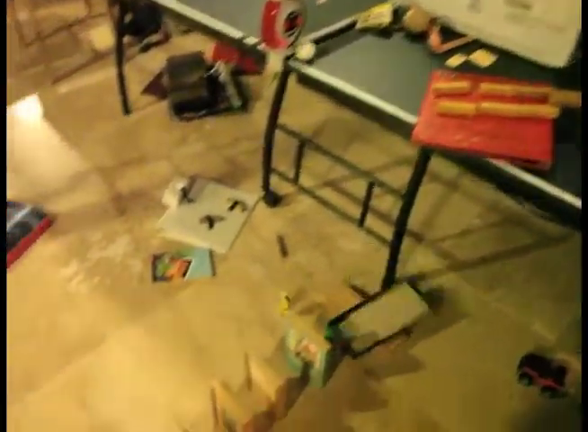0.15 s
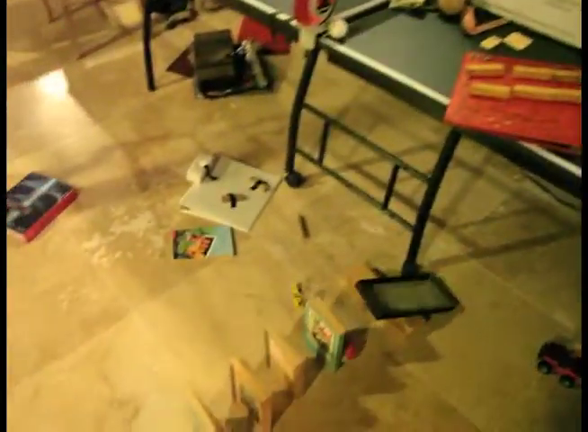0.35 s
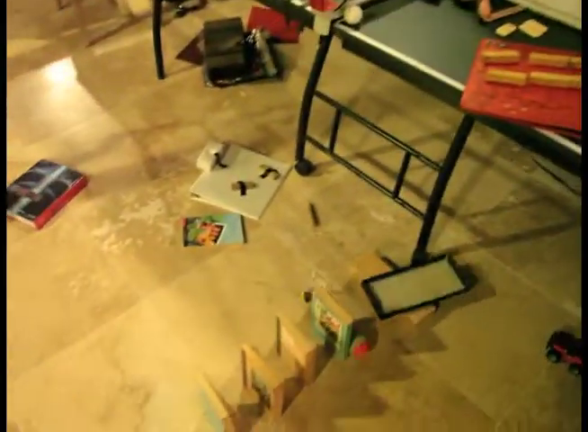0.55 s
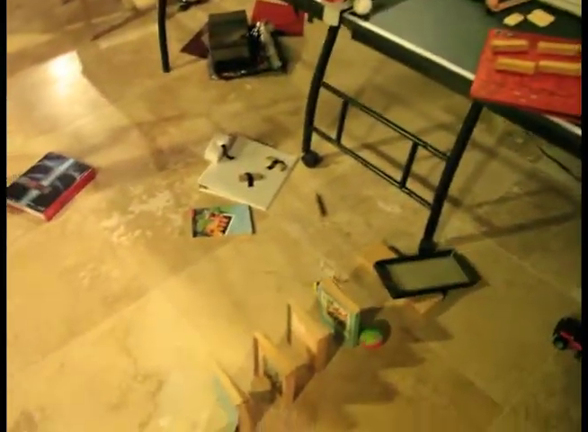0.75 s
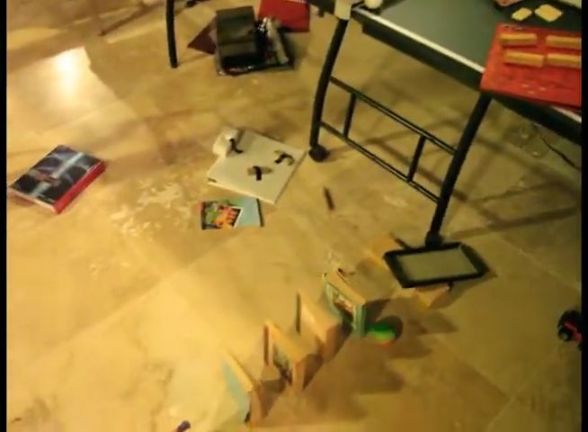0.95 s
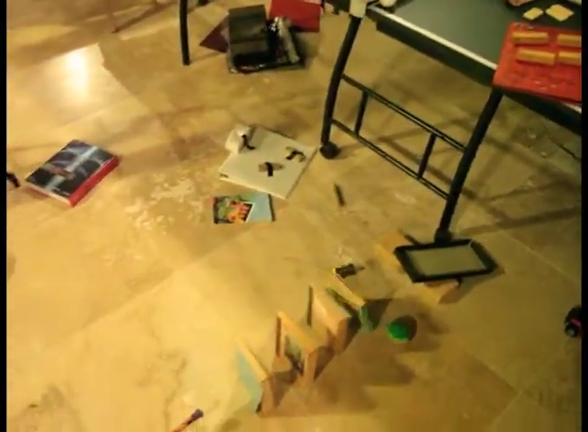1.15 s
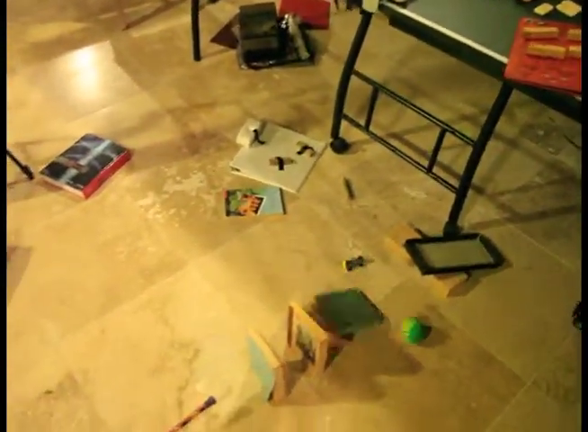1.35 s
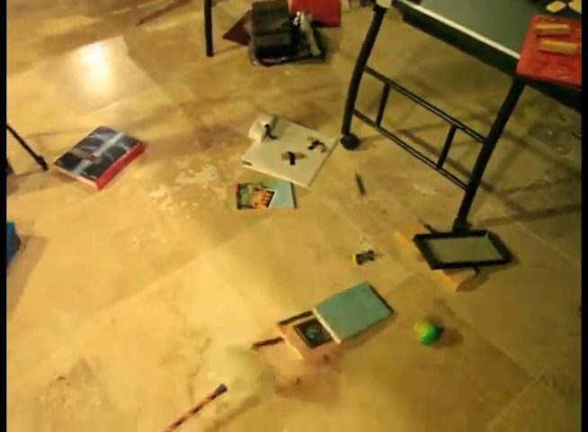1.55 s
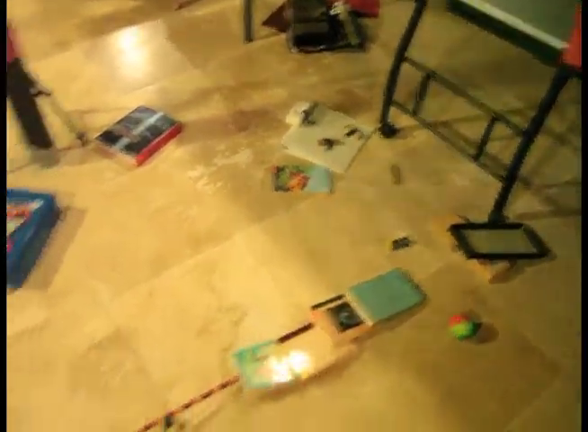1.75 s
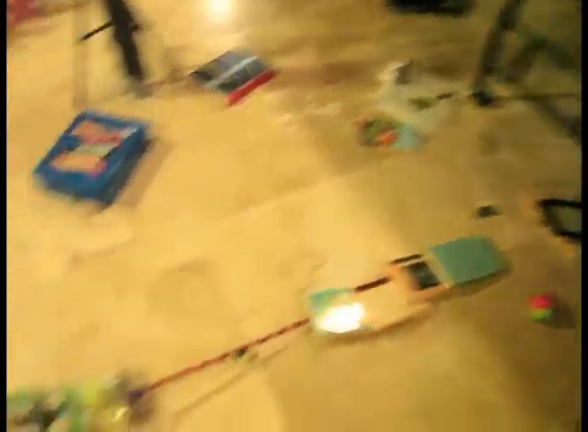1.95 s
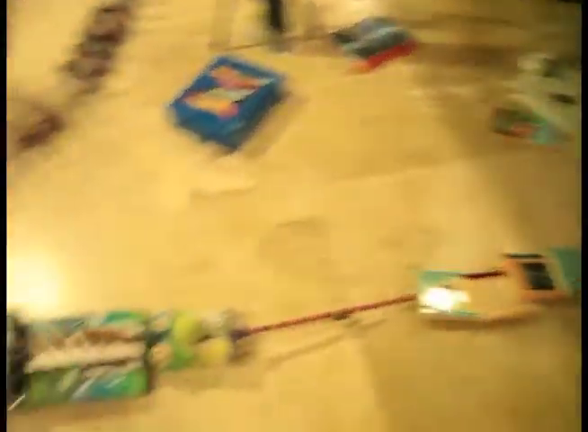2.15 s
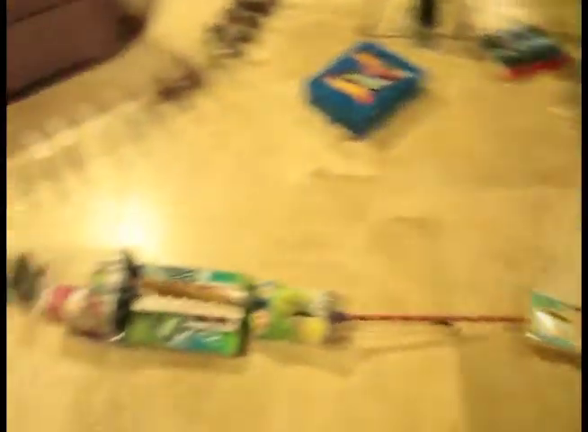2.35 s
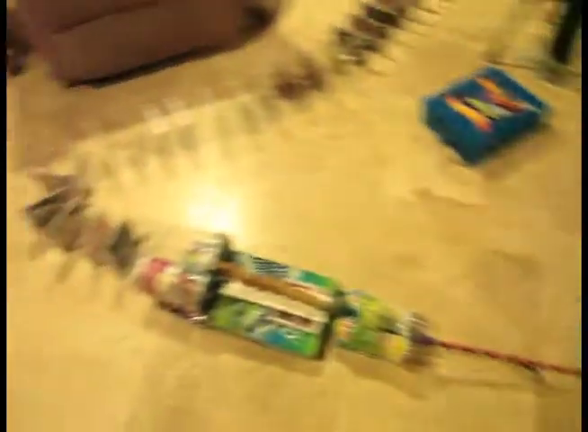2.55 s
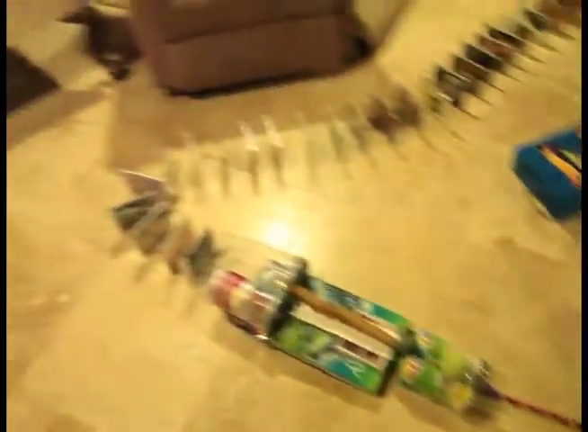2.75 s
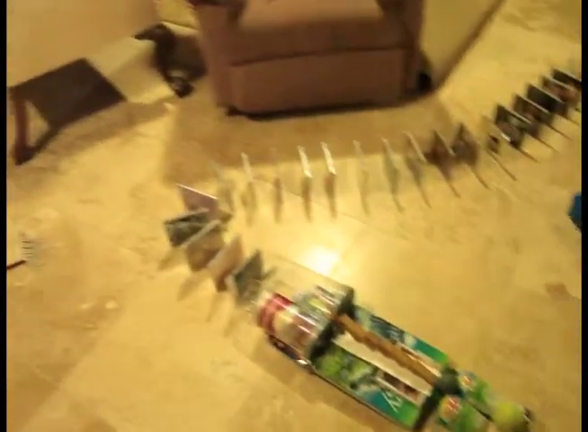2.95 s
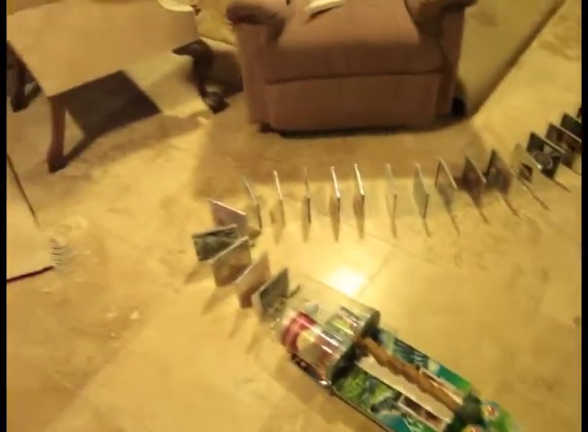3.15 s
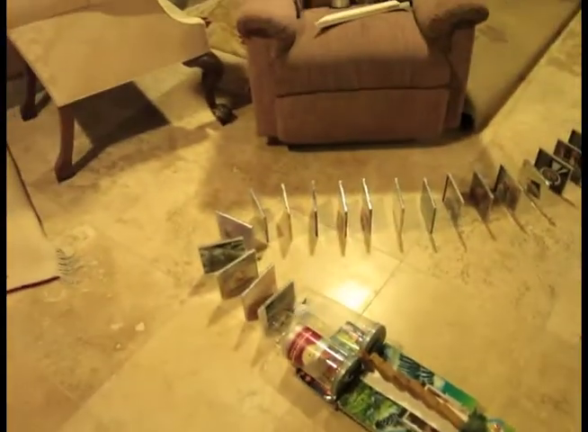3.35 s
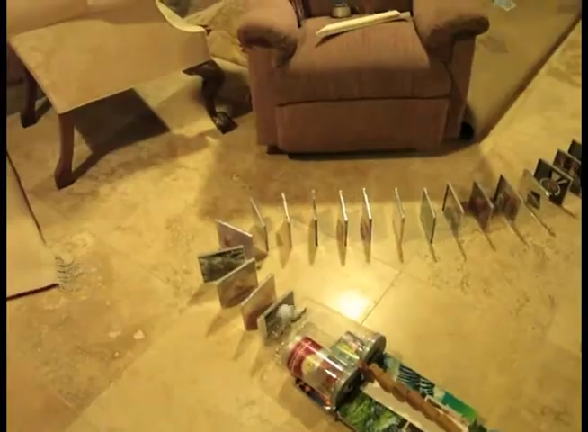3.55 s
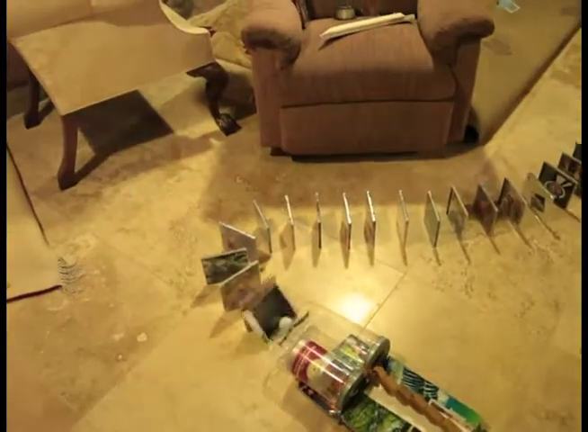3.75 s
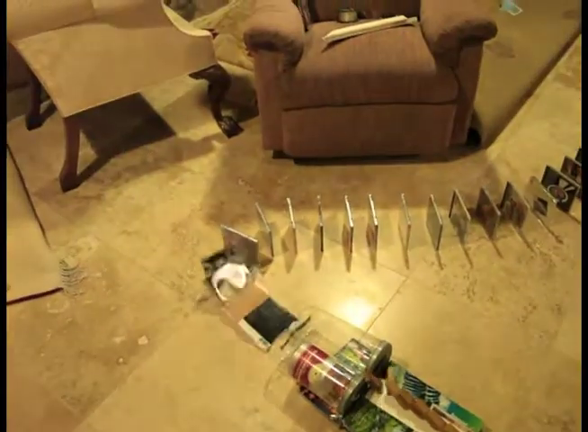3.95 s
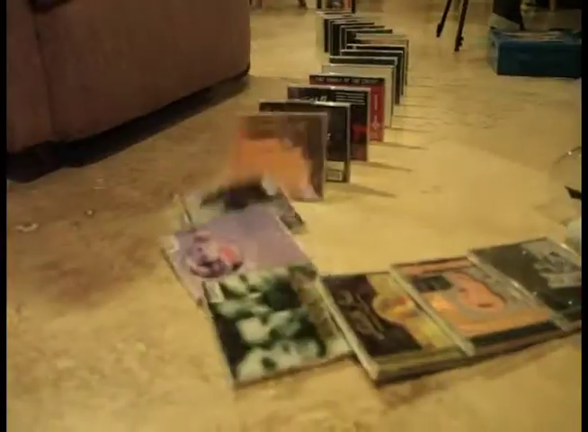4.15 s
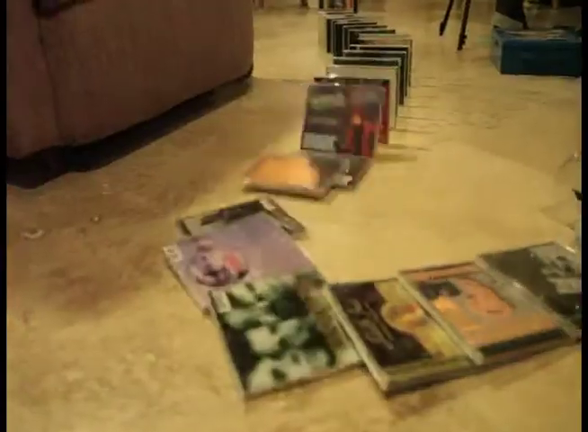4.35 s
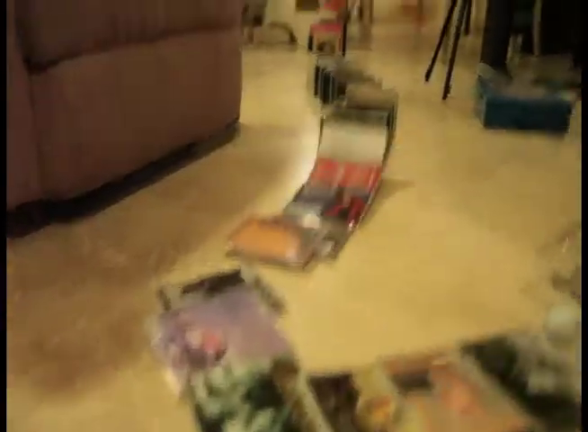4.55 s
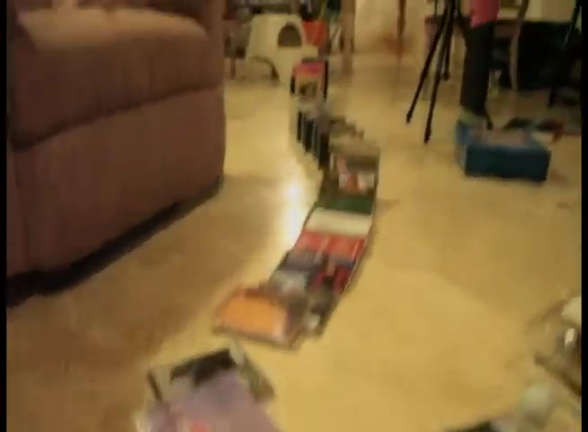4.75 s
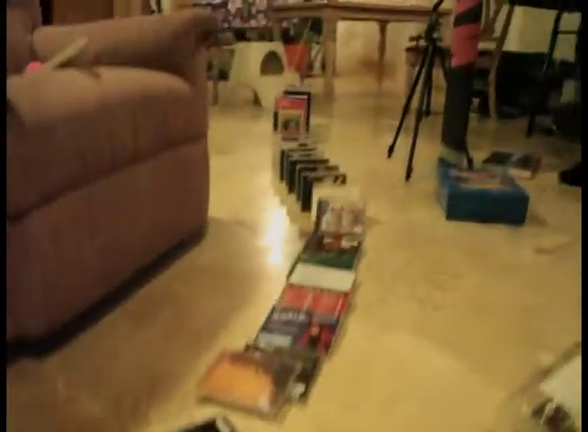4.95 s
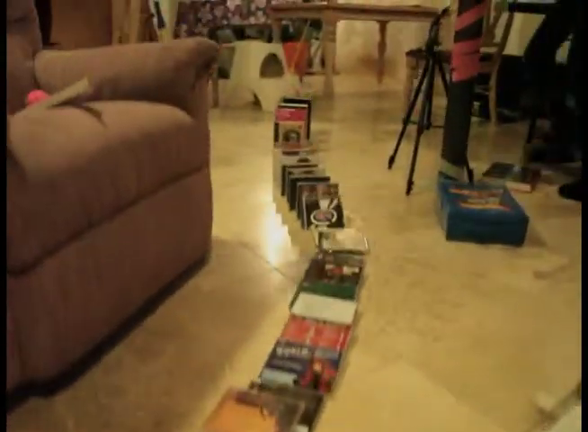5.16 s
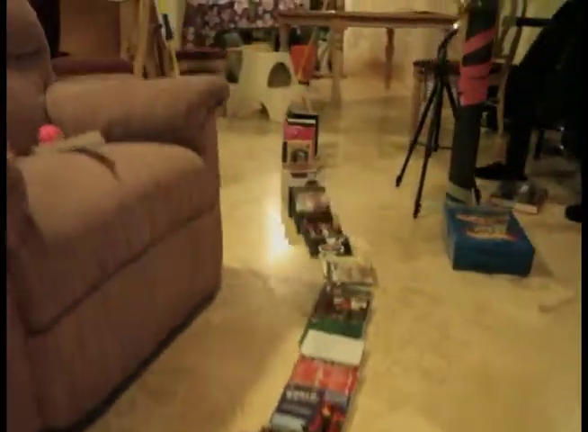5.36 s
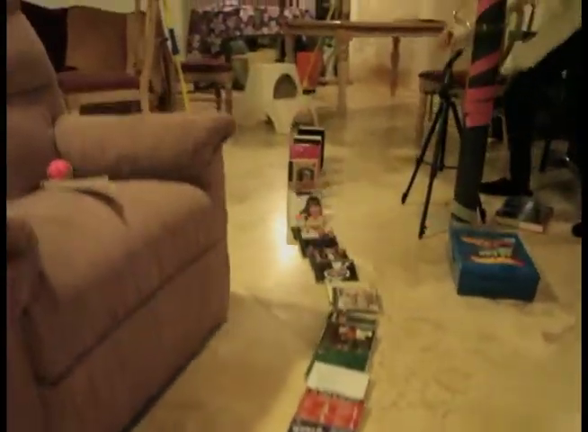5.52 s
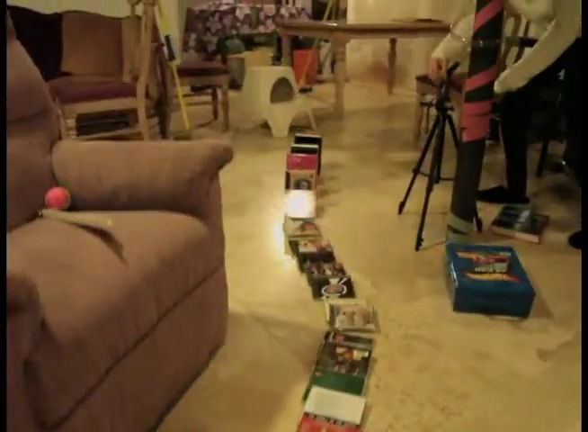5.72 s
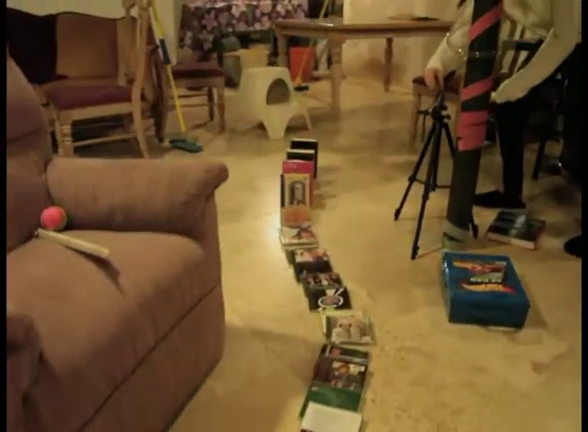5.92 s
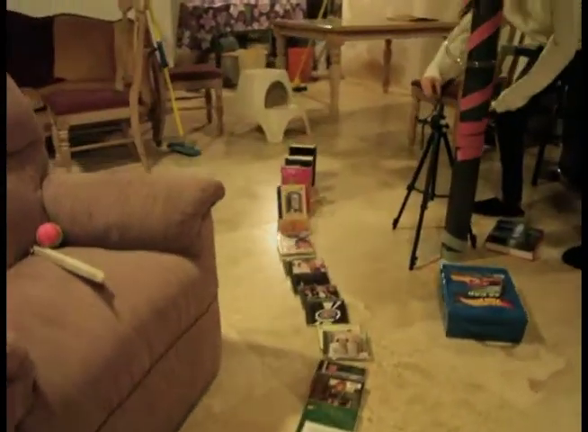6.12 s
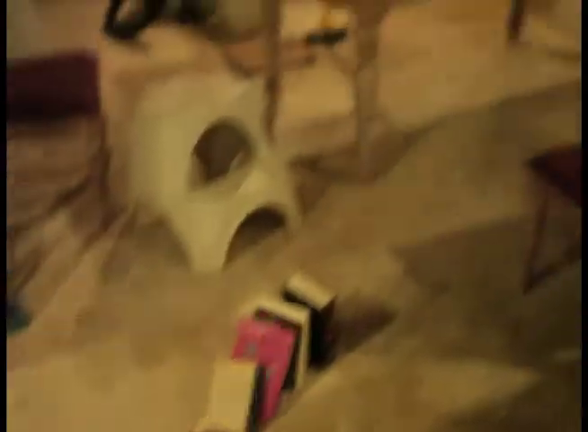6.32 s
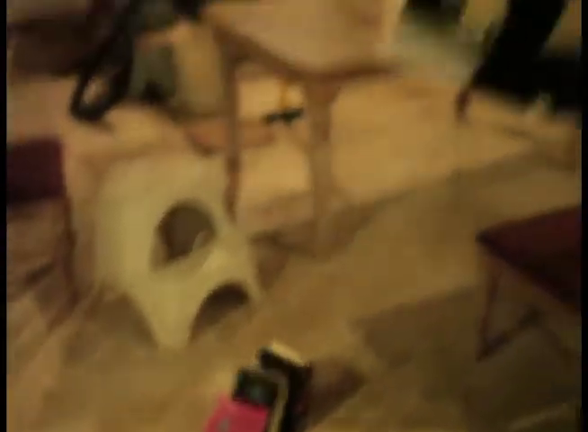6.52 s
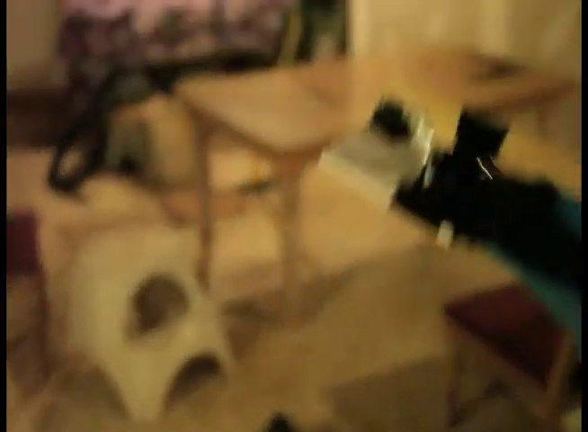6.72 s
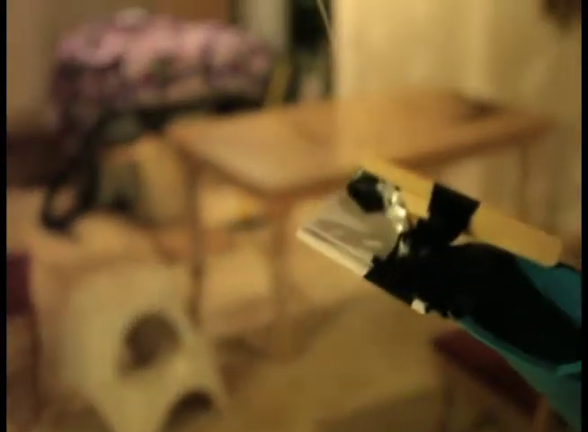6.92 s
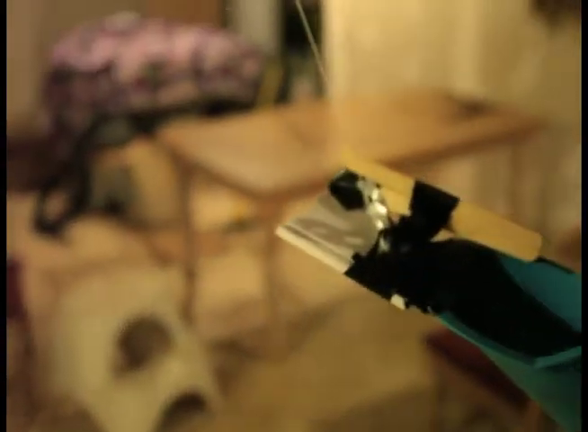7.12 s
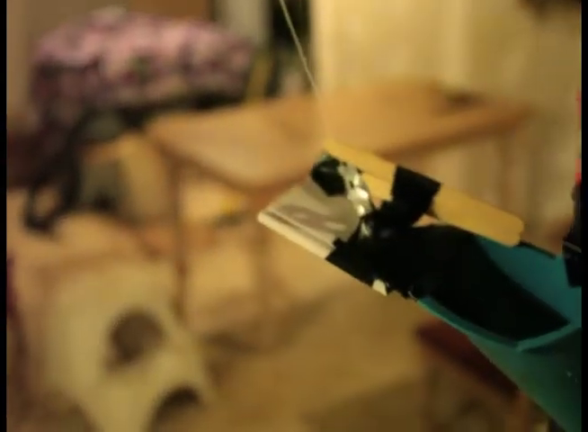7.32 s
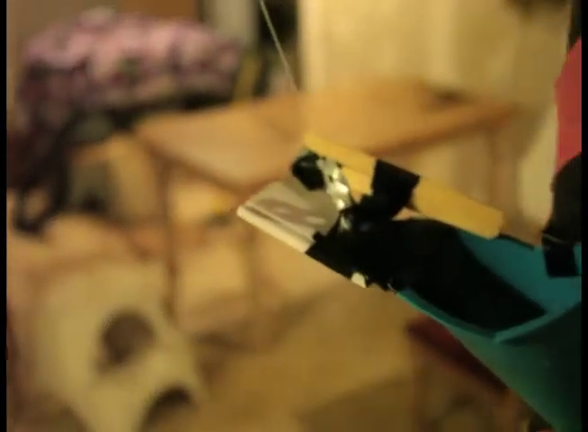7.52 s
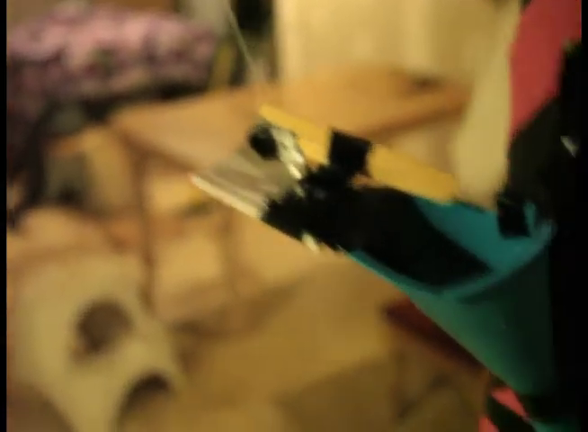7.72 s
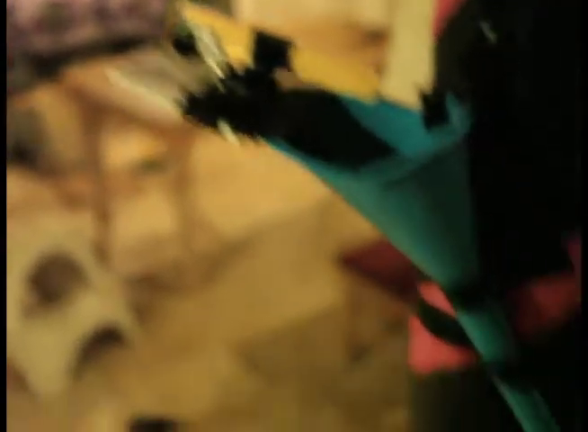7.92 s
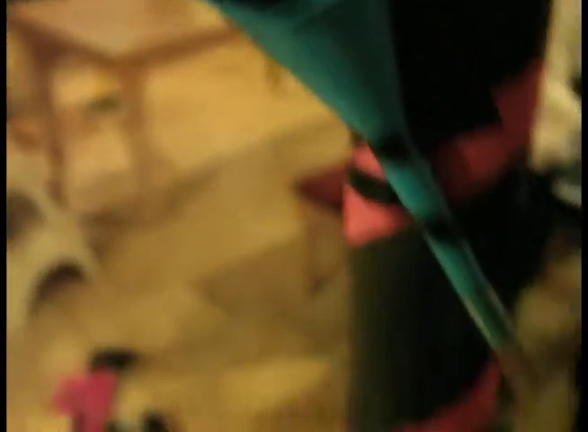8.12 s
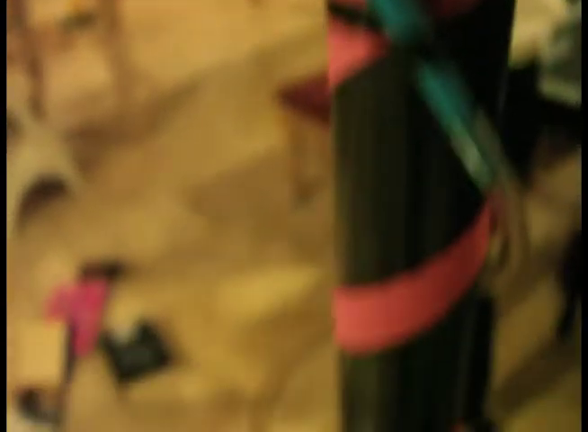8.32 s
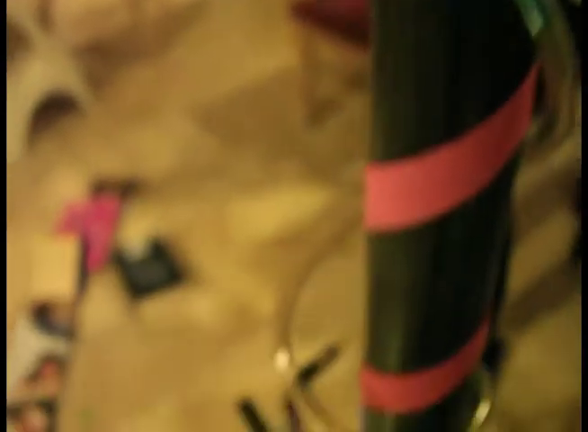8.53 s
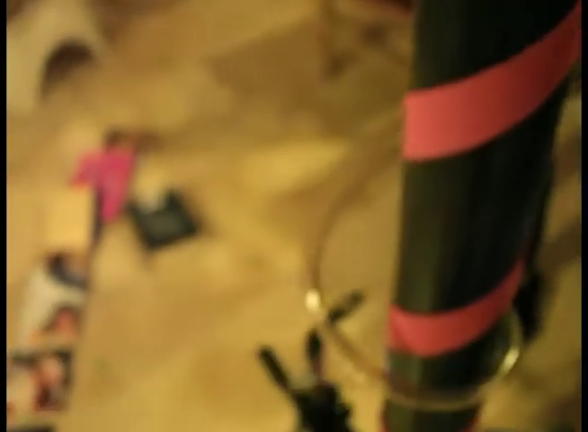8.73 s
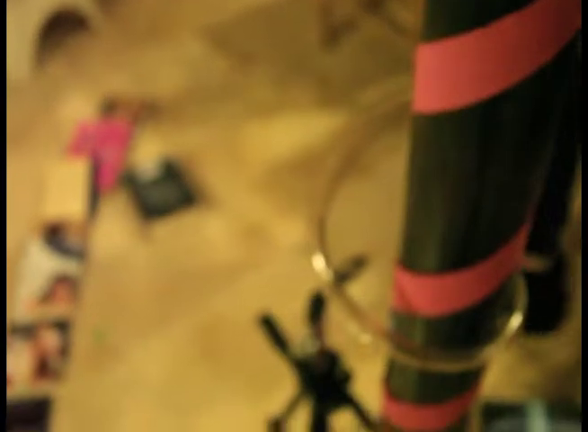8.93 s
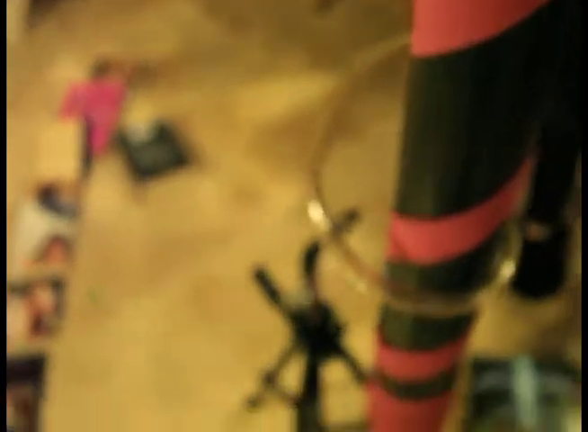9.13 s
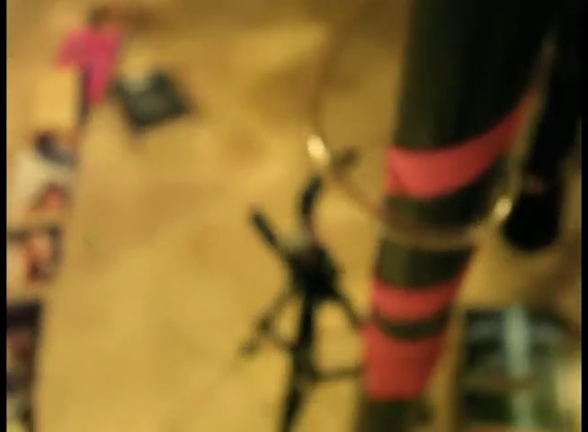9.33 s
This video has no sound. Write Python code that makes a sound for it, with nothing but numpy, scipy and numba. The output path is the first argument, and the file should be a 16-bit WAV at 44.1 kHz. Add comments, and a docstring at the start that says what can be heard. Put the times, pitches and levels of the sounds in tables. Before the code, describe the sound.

A home-made chain reaction in a bare room with a stone floor and short, lively reverberation, over faint air and low rumble. From 0 to 0.6 seconds a small hard piece bounces with bright, ringing clacks among hollow box knocks. It is nearly quiet until 1.5, when boxes topple and slap down until 2. A thin hiss surges at 1.7 and lasts to 3.8. A ball rolls softly around 1.9 and again at 3, with light plastic ticks at 2.4 and a faint squeak at 3.3. From 3.75 plastic disc cases crash in a dense, sharp clatter, strongest from 4 to 5.1, thinning by 5.8. A faint low hum lingers to 6.2. Then plastic clicks and dull thuds accompany a scrape in a funnel from 6.5, turning after 7 into a quieter, loose tube rattle, fading by 8.9. A slight scrape rises at the end, about 9.3.

```python
"""The stone floor of a bare living room, where a home-made chain reaction runs its course.
A small hard piece bounces, boxes knock each other over, a ball rolls and a row of plastic disc cases clatters
down; then something slides into a funnel and rattles down a tube. Blows are noisy contacts shaped by a body,
some with ringing modes; rolling and sliding are streams of tiny impacts through resonances and spectra.
Thin hiss, faint air and a low rumble are coloured noise; the room rings for about half a second."""
import sys
import numpy as np
from scipy import signal
from scipy.fft import rfft, irfft, next_fast_len
from scipy.io import wavfile
from numba import njit

SR = 44100
rng = np.random.default_rng(int(sys.argv[2]) if len(sys.argv) > 2 else 0)


def bounce(signal):
    """Save signal as a 16-bit WAV file at the path given by the first command-line argument."""
    frames = np.transpose(np.atleast_2d(signal))
    limited = np.clip(frames, -1, 1)
    pcm = np.round(limited * 32767).astype(np.int16)
    wavfile.write(sys.argv[1], SR, pcm)


N = 413638
TIME = np.arange(N) / SR  # s

# Levels in the tables are relative: each source has its own gain on top.
# Faint air, spectrum: [f/Hz, level/dB]
AIR_COLOUR = [(15, -32), (25, -11), (108, -3), (170, -12.5), (242, 3.5), (344, -11.5), (677, -6),
              (754, -19), (1130, -8), (1230, -10.5), (7110, -14.5), (14800, -26.5), (16000, -31)]
# Low room rumble, spectrum: [f/Hz, level/dB]
RUMBLE_COLOUR = [(30, -15), (58, -4), (85, -13), (118, 9.5), (160, 1), (230, 1.5), (400, -4.5)]
# Room decay before each source's length factor: [f/Hz, t60/s]
ROOM_T60 = [(100, 0.64), (400, 0.58), (1500, 0.62), (4000, 0.46), (7000, 0.39), (10000, 0.35),
            (15000, 0.28)]

# Boxes tipping and landing: [t/s, peak level/dB, bass level/dB, main note f/Hz]
KNOCKS = [(0.043, -21.5, -14, 278), (0.06, -13.5, 1, 532), (0.191, -18, -9, 570), (0.273, -19, -2.5, 536),
          (0.438, -26, -2, 755), (0.78, -30.5, -10, 309), (0.91, -44.5, -5, 387), (0.975, -45.5, -9, 522),
          (1.178, -44.5, 2, 319), (1.273, -45, 10, 382), (1.447, -40, 13.5, 638), (1.502, -28.5, 3.5, 390),
          (1.53, -34.5, 7, 406), (1.669, -21, 16, 361), (1.691, -15.5, 0, 345), (1.716, -17.5, 5, 343),
          (1.879, -39, 0, 293), (1.91, -26, 5, 326), (1.943, -22, -3, 503), (1.983, -16, -14, 363),
          (2.678, -22.5, -20, 653), (2.7, -32.5, 13, 369), (3.752, -9.5, -4.5, 832), (3.771, -18, 9, 740)]
# Box body, spectrum: [f/Hz, level/dB]
KNOCK_COLOUR = [(60, -41.5), (130, -17), (210, -13), (350, -0.5), (520, -6), (750, -5.5), (1200, -6.5),
                (2600, -11), (7000, -17), (9200, -32), (15000, -51)]
# Hollow box modes: [multiple of main note, level/dB, t60/s]
BOX_MODES = [(.81, -16, 0.16), (1, 3.5, 0.11), (1.13, -14, .12), (1.57, -7.5, 0.16), (2.41, -9.5, 0.097),
             (3.01, -10.5, 0.074), (3.7, -11.5, .1)]

# Small hard piece on stone: [t/s, peak level/dB, bass level/dB]
CLACKS = [(0.1152, 3, 3.5), (0.1235, -3, 7.5), (0.312, -5.5, -10), (0.4219, -18, 5), (0.4537, -13, 2),
          (0.588, -21, 4), (0.6, -5, -6.5)]
# Hard piece, spectrum: [f/Hz, level/dB]
CLACK_COLOUR = [(200, -16.5), (520, -19), (750, -23.5), (1300, -25), (2000, -12), (2700, -9.5), (3200, -2),
                (4100, -2), (4700, 2), (5600, -3), (6600, 3), (7700, -4.5), (9400, -14.5), (13000, -24.5),
                (16000, -37.5)]
# Ring of the hard piece: [f/Hz, level/dB, t60/s]
CLACK_MODES = [(3380, -7, 0.22), (3960, -7, .1), (4915, 8.5, 0.091), (5260, -13.5, .09), (6300, 6, .25),
               (6475, -12, .25), (6734, -19.5, .17), (7070, -16.5, .2), (7510, 0.5, .15),
               (7650, 3.5, 0.185), (10455, -11, .12), (13130, -27, .15)]

# Soft low bumps under some of the loudest blows: [t/s, level/dB]
LOW_BUMPS = [(0.118, -51), (4.146, -48), (4.353, -43.5), (5.072, -35), (5.696, -50)]

# Thin hiss, spectrum: [f/Hz, level/dB]
HISS_COLOUR = [(1470, -78), (2500, -11), (3240, -7), (3520, -4), (5630, -2.5), (7080, 3), (9600, -14.5),
               (11000, -15), (14300, -43), (22000, -120)]
# Surges as the hiss sets in: [t/s, level over the steady hiss/dB, decay/s]
HISS_SURGES = [(1.68, 16, 0.045), (1.877, 9.5, 0.18)]

# Runs of the ball, and one brief hollow ring after a knock: [t/s, length/s, level/dB]
ROLL = [(1.87, 0.31, -51.5), (2.695, 0.02, -55), (2.966, 0.68, -58.5)]
# Resonances of the hollow track: [f/Hz, width/Hz, level/dB]
ROLL_PEAKS = [(376, 55, 6), (545, 30, -11.5), (814, 380, -7.5), (1210, 68, -10.5), (1750, 1200, -16.5),
              (4250, 2900, -16)]
# Short grainy rubs: a rattle among the ticks, then a scrape as the ball rolls: [t/s, length/s, level/dB]
RUBS = [(2.364, 0.12, -50.5), (2.969, 0.14, -49)]

# Light plastic ticks: [t/s, peak level/dB, bass level/dB, treble level/dB]
TICKS = [(2.326, -24, 0, -15), (2.377, -22.5, -2, -15), (2.4166, -17.5, -7, -14), (2.4552, -19.5, 3, -14),
         (6.018, -29, 12.5, -4), (6.0478, -23, 5, 7), (6.0534, -24.5, 4.5, 7), (6.3097, -22, 12, -2),
         (6.921, -17, 0, 9), (6.9689, -10.5, -14, 1), (7.1268, -10, 5, 1.5), (7.152, -34, 5, 0),
         (7.207, -7.5, -12, -4), (7.2286, -21, -6, 0), (7.3278, -19.5, 14, 1), (7.5924, -31, 15.5, -5),
         (8.1124, -32, -6, 2), (8.2827, -22.5, -7, -7), (8.8513, -32.5, -1.5, -2), (9.26, -40, -5, -1),
         (9.2901, -32.5, 20, -9)]
# Tick body, spectrum: [f/Hz, level/dB]
TICK_COLOUR = [(120, -75), (200, -14.5), (883, -9.5), (1180, -9), (1480, -8.5), (3970, -3), (4860, -2),
               (7140, -7), (9060, -19.5), (10500, -14.5), (16000, -42)]

# Disc cases striking the next case, then the floor: [t/s, peak level/dB, bass level/dB]
CASES = [(3.6263, -25, 9.5), (3.7723, -12, 5.5), (3.891, -12, -4), (3.907, -9, 4.5), (3.937, -6.5, -3),
         (3.9649, -1.5, 1), (4.0161, -1.5, -3), (4.0254, -2.5, 11), (4.0408, -11, 7), (4.0737, -1.5, -1),
         (4.0974, -2.5, 6), (4.1354, 0, 4.5), (4.1456, 1, 9.5), (4.194, -7.5, 1.5), (4.2055, 0, 4),
         (4.223, 1.5, -0.5), (4.2676, -4, -1), (4.3, -6, 3.5), (4.3087, 1.5, -1.5), (4.315, 4.5, -10),
         (4.341, -1.5, 5.5), (4.3527, 6, -6.5), (4.3596, 2.5, 3), (4.4198, -5, 0), (4.4412, 0, -3.5),
         (4.4511, -3.5, -12), (4.5244, -1, -3), (4.538, 2.5, -3.5), (4.5834, -7, -2), (4.6065, -3, -4),
         (4.6232, 1, -2), (4.6863, -5, 3), (4.6938, 2.5, -11), (4.7311, -4.5, 0), (4.7634, -7, 8.5),
         (4.772, -3.5, 4), (4.837, -0.5, -4.5), (4.8524, 3.5, -1), (4.9085, -1.5, 2.5), (4.9198, -6.5, 6),
         (4.949, -8.5, -1), (5.0, -17, 2.5), (5.018, -10, 4.5), (5.0496, -1, -2), (5.0612, 0, -6.5),
         (5.0732, 3.5, -1), (5.0836, -9, 12.5), (5.142, -8.5, -3), (5.1655, -7.5, -5), (5.2458, -8, 1),
         (5.255, -7, 2), (5.3161, -9.5, 7), (5.334, -10, -2), (5.3473, -10.5, 2.5), (5.3756, -5, 0.5),
         (5.3907, -5.5, -3), (5.4518, -6.5, -14), (5.457, -0.5, 0), (5.4996, -7, 4.5), (5.5221, -4.5, 4),
         (5.5418, -1.5, -3), (5.6555, -5, 2.5), (5.686, -14, 8), (5.696, -0.5, 7.5), (5.7396, -27, 11),
         (5.7818, -15.5, -4), (5.8091, -17, -16), (5.9636, -27.5, -20), (6.215, -39.5, -6)]
# Case body, spectrum: [f/Hz, level/dB]
CASE_COLOUR = [(35, -71), (60, -31.5), (217, -18), (281, -14), (323, -16), (363, -14.5), (480, -10.5),
               (666, -7.5), (1060, -1.5), (2090, -3), (2350, -1.5), (2580, -2), (6430, 1), (14200, -26.5),
               (16000, -40.5)]
# Room share along the row before force dries it, least right by the microphone: [t/s, level/dB]
CASE_ROOM = [(3.65, -1.5), (3.92, 3.5), (4.02, -8.5), (4.35, -6.5), (4.55, -3.5), (5.8, -3)]

# Cases that shut on a pocket of air with a hollow pop: [t/s, level/dB]
POPS = [(3.9825, -8.5), (4.0715, -8.5), (4.141, -11)]

# Heavier things landing: [t/s, peak level/dB, bass level/dB]
THUDS = [(6.304, -37, 4), (6.477, -23.5, -9), (6.974, -35, -11), (7.324, -14, 0.5), (7.344, -17, -2),
         (7.891, -54, 11)]
# Thud body, spectrum: [f/Hz, level/dB]
THUD_COLOUR = [(35, -52), (70, -12), (115, 0), (170, 4), (220, -1), (310, -3), (400, -9), (520, -15),
               (790, -10.5), (1600, -9.5), (3000, -12.5), (6500, -16.5), (9000, -30)]
# Thud modes: [f/Hz, level/dB, t60/s]
THUD_MODES = [(111, -2, 0.52), (172, 3, 0.093), (211, 4, 0.11), (305, -17, 0.079)]

# Sliding into the funnel and down the tube: [t/s, level/dB, treble level/dB]
SLIDE = [(6.43, -61, -65), (6.51, -41, -46), (6.77, -37, -40.5), (7.07, -48.5, -52), (7.65, -53, -53),
         (7.87, -53.5, -45.5), (8.14, -53, -56.5), (8.86, -53, -56.5), (8.93, -79, -90)]
# The final stretch, beyond the tube: [t/s, level/dB, treble level/dB]
RUN_OUT = [(9.02, -65, -87), (9.13, -61.5, -84), (9.27, -58, -77), (9.34, -45, -46.5), (9.38, -45, -47)]
# Parts of the way that ring in turn as the contact passes: [start t/s, end t/s, f/Hz, level/dB]
SLIDE_RING = [(6.437, 6.854, 2900, -3.5), (7.2, 7.696, 5080, -1), (7.872, 7.96, 2860, 2),
              (8.3, 8.896, 1380, -11.5), (9.014, 9.38, 1900, -2.5)]
# Funnel wall, spectrum: [f/Hz, level/dB]
SLIDE_COLOUR = [(200, -10), (420, -13), (600, -5.5), (950, 0), (1300, -5), (2400, 4.5), (3700, -2.5),
                (4700, -20)]
# Tube wall, spectrum: [f/Hz, level/dB]
TUBE_COLOUR = [(300, -27), (430, -18), (620, -5), (900, -4.5), (1200, 1.5), (1700, -2.5), (2400, -5),
               (3600, -8), (5000, -22.5)]
# Treble edge of the contacts, spectrum: [f/Hz, level/dB]
RATTLE_COLOUR = [(3000, -16), (4500, 0), (5200, 0.5), (7100, 2), (8700, -14.5), (12000, -23.5),
                 (16000, -42)]


def undb(db):
    """Decibels to gain."""
    return 10 ** (np.asarray(db) / 20)


def unit(x):
    """Scale to rms 1."""
    return x / np.sqrt(np.mean(x ** 2) + 1e-30)


def unit_energy(x):
    """Scale to energy 1."""
    return x / np.sqrt(np.sum(x ** 2) + 1e-30)


def at_hz(points, hz):
    """Read (Hz, value) points on a log-frequency axis."""
    f, value = np.transpose(points)
    return np.interp(np.log(np.maximum(hz, 1)), np.log(f), value)


def spectrum_db(points, hz):
    """A spectrum that falls 20 dB per octave beyond its ends, for up to four octaves."""
    hz = np.maximum(hz, 1)
    octaves_below = np.maximum(np.log2(points[0][0] / hz), 0)
    octaves_above = np.maximum(np.log2(hz / points[-1][0]), 0)
    return at_hz(points, hz) - 20 * np.minimum(octaves_below + octaves_above, 4)


def colour(x, points):
    """Give a steady sound a spectrum; rms 1."""
    size = next_fast_len(N)
    gain = undb(spectrum_db(points, np.fft.rfftfreq(size, 1 / SR)))
    return unit(irfft(rfft(x, size) * gain, size)[:N])


def causal(db):
    """Minimum-phase response with this gain, by folding its cepstrum."""
    cepstrum = irfft(np.log(undb(db)))
    half = len(cepstrum) // 2
    folded = np.r_[cepstrum[0], 2 * cepstrum[1:half], np.zeros(half)]
    return irfft(np.exp(rfft(folded)))


def curve(table, column=1):
    """One column of a table at every sample."""
    rows = np.array(table)
    return np.interp(TIME, rows[:, 0], rows[:, column])


def swell(start, end, db, attack_s, release_s):
    """Gain that rises, holds and dies away."""
    attack = np.clip((TIME - start) / attack_s, 0, 1)
    release = np.exp(-np.maximum(TIME - end, 0) / release_s)
    return undb(db) * attack * release


def walk(rate):
    """Slow chance: random knots, rate per second, joined by straight lines."""
    knots = rng.standard_normal(int(N / SR * rate) + 2)
    return np.interp(TIME * rate, np.arange(len(knots)), knots)


def grains(rate, spread_db):
    """Tiny impacts at random moments, rate per second, a few much stronger than the rest."""
    sizes = undb(spread_db * np.minimum(rng.exponential(size=N), np.pi))
    strikes = rng.random(N) < rate / SR
    return unit(strikes * sizes * rng.choice([-1, 1], N))


def add(track, s, sound):
    """Mix a sound in at a time."""
    start = max(int(s * SR), 0)
    track[start:start + len(sound)] += sound[:N - start]


@njit
def resonance(x, hz, width):
    """State-variable band-pass whose centre may move."""
    y, band, low = np.empty(len(x)), 0., 0.
    for i in range(len(x)):
        g, damping = np.tan(np.pi * hz[i] / SR), width / hz[i]
        v = (band + g * (x[i] - low)) / (1 + g * (g + damping))
        band, low, y[i] = 2 * v - band, low + 2 * g * v, damping * v
    return y


def room_response(early_db, early_s, length=0.9):
    """Reflections from floor and furniture, then a diffuse tail whose treble dies first."""
    size = 32768
    t = TIME[:size]
    hz, noise = np.fft.rfftfreq(size, 1 / SR), rfft(rng.standard_normal(size))
    centres, t60s = np.transpose(ROOM_T60)
    tail = np.zeros(size)
    for share, t60 in zip(np.eye(len(centres)), t60s):
        band = irfft(noise * at_hz(np.c_[centres, share], hz))
        tail += band * np.exp(-np.log(1000) * t / (t60 * length))
    tail = unit_energy(tail * np.clip((t - .004) / 0.0068, 0, 1))
    early = rng.standard_normal(size) * (rng.random(size) < 2500 / SR) * np.exp(-t / early_s)
    return unit_energy(tail + undb(early_db) * unit_energy(early * (t > .003)))


def places(early_db, early_s, length, count):
    """The room as it answers from several spots on the floor."""
    return [room_response(early_db, early_s, length) for _ in range(count)]


def room(x, early_db, early_s):
    """The room's answer to a continuous sound."""
    return signal.oaconvolve(x, room_response(early_db, early_s))[:N]


def ring(modes, scale, scatter_db=3):
    """Decaying modes, weighted anew by each blow; little is radiated below the lowest."""
    t = TIME[:SR // 4]
    hz, db, t60 = np.transpose(modes)[:, :, None]
    weight, detune = rng.standard_normal((2, len(modes), 1))
    waves = np.sin(2 * np.pi * scale * hz * (1 + .002 * detune) * t) * np.exp(-np.log(1000) * t / t60)
    mix = np.sum(undb(db + scatter_db * weight) * waves, axis=0)
    radiation = signal.butter(2, scale * hz.min() / 2, "highpass", fs=SR)
    return unit_energy(signal.lfilter(*radiation, mix))


def shell(ring_s, count=64):
    """Short, inharmonic modes of a thin plastic shell, different for each one."""
    t = TIME[:SR // 20]
    hz, phase = rng.uniform(609, 9500, (count, 1)), rng.uniform(0, 2 * np.pi, (count, 1))
    return unit_energy(np.sum(np.sin(2 * np.pi * hz * t + phase) * np.exp(-t / ring_s), axis=0))


def strike(decay_s, rebound_db, crack_db, shell_db, shell_s, size):
    """The push of one blow: a first crack, a chatter of contacts, a weak rebound and a shell's ring."""
    t = TIME[:size]
    contacts = rng.standard_normal(size) * np.where(rng.random(size) < .04, 1, .15)
    after = t - 0.014 * rng.uniform(.5, 2)  # a struck thing drops back 7 to 28 ms later
    rebound = undb(rebound_db) * (after > 0) * np.exp(-np.abs(after) / decay_s)
    push = unit_energy(contacts * (np.exp(-t / decay_s) + rebound))
    push[0] += undb(crack_db)
    add(push, 0, undb(shell_db) * shell(shell_s))
    return unit_energy(push)


def blows(times, peak_db, bass_db, points, rooms, treble_db, room_db, decay_s, rebound_db,
          bass_hz, treble_hz, crack_db, shell_db, shell_s, modes=None, modes_db=0, notes=1, size=4096):
    """Strikes excite a body and its modes, heard directly and through the room."""
    track = np.zeros(N)
    hz = np.fft.rfftfreq(size, 1 / SR)
    body_db = spectrum_db(points, hz)
    body_gain = np.sqrt(np.sum(causal(body_db) ** 2))
    bass = 1 / (1 + (hz / bass_hz) ** 2)
    treble = 1 - 1 / (1 + (hz / treble_hz) ** 4)
    each = np.broadcast(times, peak_db, bass_db, treble_db, room_db, decay_s, notes)
    for k, (s, peak, low, high, wet, decay, note) in enumerate(each):
        push = strike(decay, rebound_db, crack_db, shell_db, shell_s, size)
        # each blow meets another spot, which favours other parts of the spectrum
        spot_db = .6 * np.interp(np.sqrt(hz), np.linspace(0, np.sqrt(SR / 2), 24), rng.standard_normal(24))
        tone_db = low * bass + high * treble + spot_db
        sound = np.zeros(SR // 4)
        sound[:size] = signal.fftconvolve(push, causal(body_db + tone_db))[:size] / body_gain
        if modes is not None:
            tone_at_note = np.interp(note * modes[1][0], hz, tone_db)
            sound += undb(modes_db + tone_at_note) * ring(modes, note)
        add(track, s, undb(peak) * sound)
        add(track, s, undb(peak + wet) * signal.fftconvolve(sound, rooms[k % len(rooms)]))
    return track


def room_tone():
    """Faint air and a low rumble, both coloured noise."""
    air = undb(-64) * colour(rng.standard_normal(N), AIR_COLOUR)
    return air + undb(-73.5) * colour(rng.standard_normal(N), RUMBLE_COLOUR)


def boxes():
    """Hollow boxes tip and slap down, each with its own note; heavy landings are duller and drier."""
    s, peak_db, bass_db, note_hz = np.transpose(KNOCKS)
    weight_db = peak_db - peak_db.mean()
    rooms = places(early_db=-3, early_s=0.0089, length=0.89, count=5)
    return undb(11.5) * blows(
        s, peak_db, bass_db, KNOCK_COLOUR, rooms,
        treble_db=0.5 - .2 * weight_db, room_db=1.1 - 0.067 * weight_db,
        decay_s=0.0065, rebound_db=-17, bass_hz=510, treble_hz=2500,
        crack_db=-4.5, shell_db=-20.5, shell_s=0.0032, modes=BOX_MODES, modes_db=-7.5, notes=note_hz)


def hard_piece():
    """A small hard piece bounces on the stone with a bright ring, brighter the harder it lands."""
    s, peak_db, bass_db = np.transpose(CLACKS)
    rooms = places(early_db=-4.5, early_s=0.018, length=0.78, count=4)
    return undb(10.5) * blows(
        s, peak_db, bass_db, CLACK_COLOUR, rooms,
        treble_db=5 + .5 * peak_db, room_db=2.0,
        decay_s=0.0033, rebound_db=-24.5, bass_hz=1700, treble_hz=10500,
        crack_db=-6.0, shell_db=-13.0, shell_s=0.0046, modes=CLACK_MODES, modes_db=-16.5)


def low_bumps(swing_s=0.0042):
    """Soft low bumps under some of the loudest blows: a pulse that swings one way, then back once."""
    track, t = np.zeros(N), TIME[:SR // 10] / swing_s
    for s, db in LOW_BUMPS:
        add(track, s, undb(db) * np.e * t * (1 - t / 2) * np.exp(-t))
    return track


def thin_hiss():
    """An even noise hiss that surges at first, with a soft top band that sinks, then creeps upward."""
    centre_hz = 11700 + 900 * np.minimum(np.abs(TIME - 2.5), 2)  # lowest at 2.5 s, moves 900 Hz per s
    top = resonance(resonance(rng.standard_normal(N), centre_hz, 4500.), centre_hz, 4500.)
    surge = np.ones(N)
    for s, db, decay_s in HISS_SURGES:
        surge += swell(s, s, db, attack_s=0.014, release_s=decay_s)
    hiss = undb(1.5) * surge * colour(rng.standard_normal(N), HISS_COLOUR)
    hiss += undb(-10) * np.sqrt(surge) * unit(top)
    return swell(1.68, 3.8, -52.5, attack_s=0.021, release_s=0.087) * hiss


def rolling_ball():
    """Tiny impacts sound the hollow track as the ball rolls; grainy rubs and a squeak join in."""
    bumps = grains(rate=420, spread_db=1.5) * undb(2.1 * walk(16))
    track = sum(undb(db) * resonance(bumps, np.full(N, 1. * hz), 1. * width) for hz, width, db in ROLL_PEAKS)
    rolling = sum(swell(s, s + length, db, attack_s=0.02, release_s=0.12) for s, length, db in ROLL)
    sound = undb(1.0) * unit(track) * rolling
    # the first run sounds a slowly rising note
    note_start, note_end = 1.92, 2.18  # s
    note_hz = 499 + 88 * np.clip(TIME - note_start, 0, .5)
    note = unit(resonance(resonance(bumps, note_hz, 87.0), note_hz, 87.0))
    sound += note * swell(note_start, note_end, -50, attack_s=.04, release_s=0.032)
    rub_colour = [(600, -3), (1800, -5.0), (4000, -1.5), (5200, -5), (6500, -9)]  # f/Hz, level/dB
    rub = colour(grains(rate=900, spread_db=2.0), rub_colour)
    sound += rub * sum(swell(s, s + length, db, attack_s=.025, release_s=0.024) for s, length, db in RUBS)
    # the last run squeaks: an unsteady, sagging sine
    squeak_start, squeak_end = 3.3, 3.43  # s
    squeak_hz = 1240 - 360 * np.clip(TIME - squeak_start, 0, .5)
    squeak = np.sin(2 * np.pi * np.cumsum(squeak_hz * (1 + 0.031 * walk(130))) / SR)
    sound += squeak * swell(squeak_start, squeak_end, -56, attack_s=.06, release_s=.02)
    return sound + undb(-3.0) * room(sound, early_db=3.5, early_s=0.021)


def ticks():
    """Light plastic parts click; the loud ones are near, so drier."""
    s, peak_db, bass_db, treble_db = np.transpose(TICKS)
    near_db = peak_db - peak_db.mean()
    rooms = places(early_db=-4.5, early_s=0.019, length=0.85, count=4)
    return undb(7.5) * blows(
        s, peak_db, bass_db, TICK_COLOUR, rooms,
        treble_db=treble_db, room_db=-3.5 - 0.33 * near_db,
        decay_s=0.0016, rebound_db=-24, bass_hz=1500, treble_hz=7000,
        crack_db=2.0, shell_db=-1.5, shell_s=0.005)


def disc_cases():
    """Cases fall along the row, loose lids chattering; hard blows are shorter, far ones duller and wetter."""
    s, peak_db, bass_db = np.transpose(CASES)
    force_db = np.maximum(peak_db - np.median(peak_db), -10)
    # the hardest blows face the microphone, so they are drier
    room_db = np.interp(s, *np.transpose(CASE_ROOM)) - 0.24 * force_db
    contact_s = 0.0054 * undb(-0.2 * force_db)
    rooms = places(early_db=-4, early_s=.01, length=0.91, count=16)
    return undb(11.5) * blows(
        s, peak_db, bass_db, CASE_COLOUR, rooms,
        treble_db=-0.38 * room_db, room_db=room_db,
        decay_s=contact_s, rebound_db=-14, bass_hz=1160, treble_hz=7460,
        crack_db=-16.5, shell_db=-8, shell_s=0.0054)


def hollow_pops(pop_hz=720, decay_s=0.0012):
    """The pocket of air under a closing case rings for a few cycles."""
    track, t = np.zeros(N), TIME[:SR // 20]
    age = t / decay_s
    for s, db in POPS:
        add(track, s, undb(db) * age * np.exp(1 - age) * np.sin(2 * np.pi * pop_hz * t))
    return undb(-5) * track + undb(-15) * room(track, early_db=-1.5, early_s=0.017)


def low_note():
    """A faint, slowly decaying low sine hangs on after the last cases, then is damped."""
    start, end, hz, db, t60 = 5.70, 6.22, 176.3, -53.5, 7.2  # s, s, Hz, dB, s
    age = np.maximum(TIME - start, 0)
    damping = np.clip((end - TIME) / 0.061, 0, 1)
    return undb(db) * np.sin(2 * np.pi * hz * age) * np.exp(-np.log(1000) * age / t60) * damping


def thuds():
    """Heavier things drop with a dull knock, the duller and drier the heavier they are."""
    s, peak_db, bass_db = np.transpose(THUDS)
    weight_db = peak_db - peak_db.mean()
    rooms = places(early_db=-5, early_s=0.016, length=0.69, count=4)
    return undb(20.5) * blows(
        s, peak_db, bass_db, THUD_COLOUR, rooms,
        treble_db=-3.5 - 0.52 * weight_db, room_db=0.5 - 0.25 * weight_db,
        decay_s=0.0065, rebound_db=-19, bass_hz=303, treble_hz=1200,
        crack_db=-7.0, shell_db=-13, shell_s=0.0063, modes=THUD_MODES, modes_db=-13)


def tube_knocks():
    """Loose knocks at uneven gaps, about 55 per second, each a noise burst of a few milliseconds."""
    knocks = np.zeros(N)
    gaps, strength = rng.uniform(.3, 1.7, (1000, 2)).T
    starts = (np.cumsum(gaps) * SR / 55).astype(int)
    knocks[starts[starts < N]] = strength[starts < N]
    bursts = signal.lfilter([1], [1, -np.exp(-1 / (0.0051 * SR))], knocks)
    return unit(bursts * rng.standard_normal(N))


def funnel_and_tube():
    """A fine scrape in the funnel opens into a loose rattle of single knocks down the tube."""
    in_tube = np.interp(TIME, [6.95, 7.45], [0, 1])
    funnel_gain, tube_gain = np.sqrt(1 - in_tube), np.sqrt(in_tube)
    scrape = grains(rate=6000, spread_db=1.5)
    contacts = funnel_gain * scrape + tube_gain * unit(tube_knocks() + scrape)
    wall = funnel_gain * colour(contacts, SLIDE_COLOUR) + tube_gain * colour(contacts, TUBE_COLOUR)
    hollow = np.zeros(N)
    for start, end, hz, db in SLIDE_RING:
        part = unit(resonance(contacts, np.full(N, 1. * hz), 800.0))
        hollow += swell(start, end, db, attack_s=0.048, release_s=0.041) * part
    path = np.vstack([SLIDE, RUN_OUT])
    level_db = curve(path)
    edge = undb(curve(path, column=2) - level_db - 2.0) * colour(contacts, RATTLE_COLOUR)
    level = undb(level_db) * (TIME >= path[0, 0])
    sound = level * (undb(-3) * (wall + hollow) + edge)
    return undb(1) * sound + undb(-5) * room(sound, early_db=-0.5, early_s=0.011)


def scene():
    """All stages of the chain at one microphone."""
    hits = boxes() + hard_piece() + low_bumps() + ticks() + disc_cases() + hollow_pops() + thuds()
    steady = room_tone() + thin_hiss() + rolling_ball() + low_note() + funnel_and_tube()
    return (hits + steady)[None]


def record(dry):
    """The loudest cracks clip; a steep low-pass cuts the top at 15.9 kHz."""
    low_pass = signal.ellip(8, .2, 70, 15900, fs=SR, output="sos")
    return signal.sosfilt(low_pass, np.clip(dry, -.9, .9))


dry = scene()
out = record(dry)
bounce(out)
```